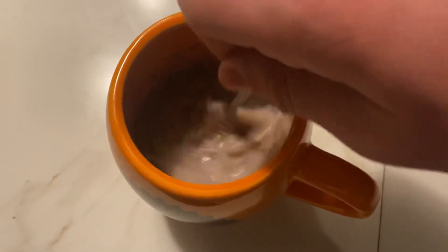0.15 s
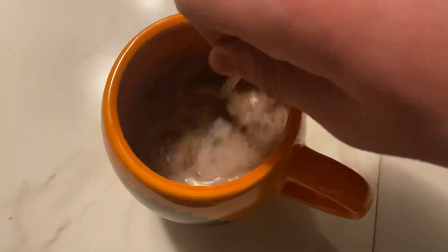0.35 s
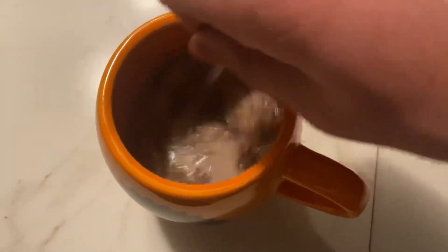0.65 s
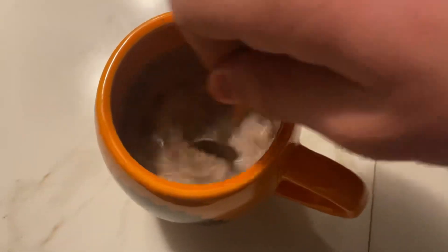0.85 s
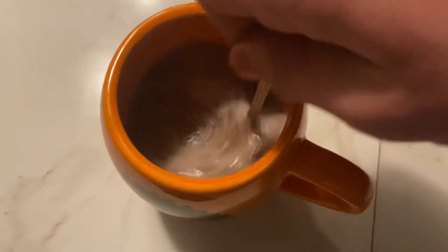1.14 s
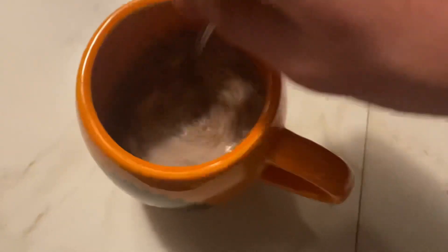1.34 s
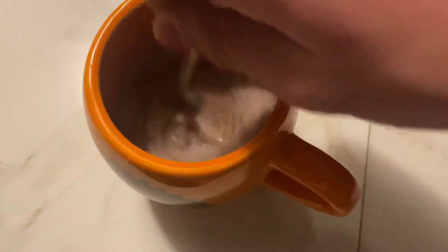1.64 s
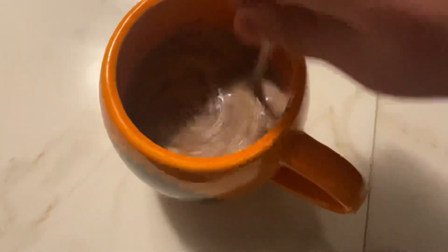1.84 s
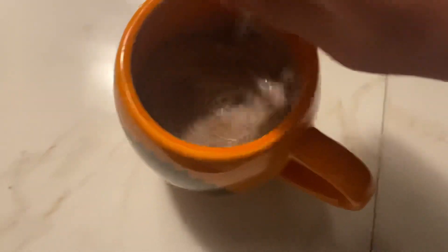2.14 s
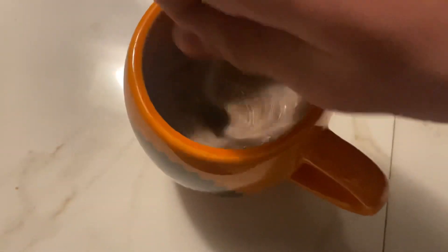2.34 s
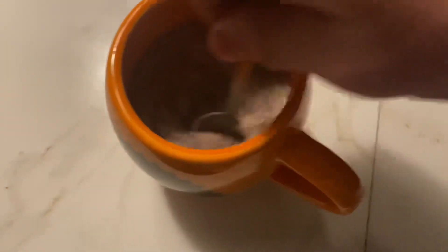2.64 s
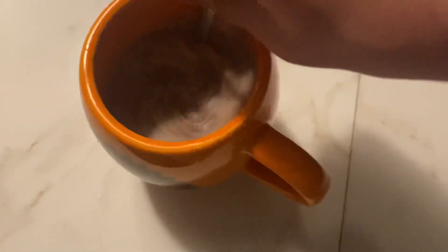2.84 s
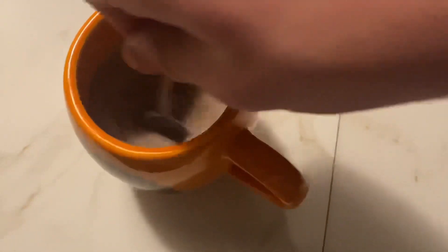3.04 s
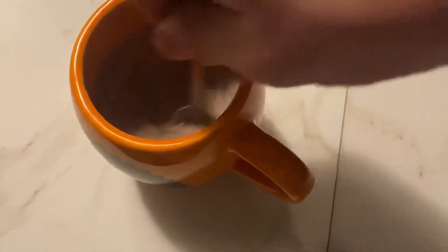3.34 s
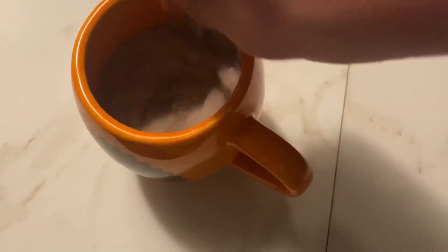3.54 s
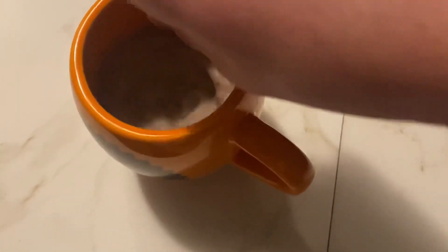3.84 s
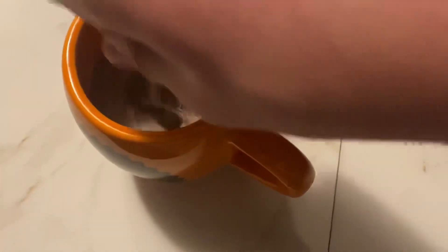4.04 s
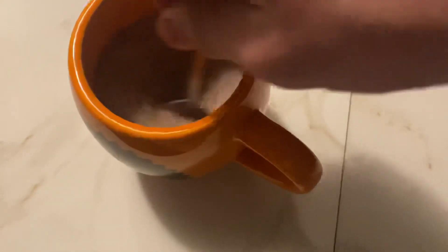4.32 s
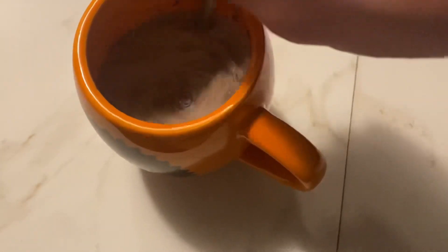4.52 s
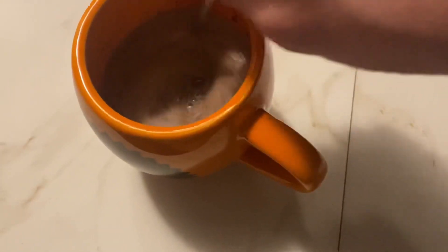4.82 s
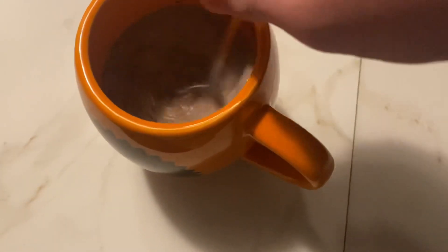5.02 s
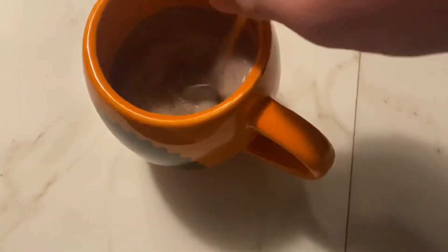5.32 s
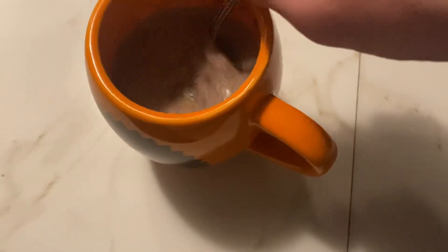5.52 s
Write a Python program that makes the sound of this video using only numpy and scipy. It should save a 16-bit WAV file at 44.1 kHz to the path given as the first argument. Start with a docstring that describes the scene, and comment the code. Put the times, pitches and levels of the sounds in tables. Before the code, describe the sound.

A metal spoon clinks quickly and unevenly around a ceramic mug, with hollow knocks, wet gurgles and light froth swishes in a small kitchen.

```python
"""A metal spoon stirs a drink in a ceramic mug on a kitchen counter, close to a pair of small microphones.
Each blow is a tick of filtered noise with dying sines for the wall of the mug and the air inside it.
Between blows the drink gurgles (noise around a sliding pitch) and the froth swishes (swarms of ringing bubbles).
Now and then the spoon chatters along the wall, and the mug rocks and knocks on the counter.
A small, hard room answers with dense echoes over a low hum of filtered noise."""
import sys
import numpy as np
from scipy import signal
from scipy.fft import rfft, irfft
from scipy.io import wavfile

SR = 44100
rng = np.random.default_rng(int(sys.argv[2]) if len(sys.argv) > 2 else 0)


def inscribe(sig):
    """Save sig as 16-bit PCM at rate SR to the path in sys.argv[1].

    A 1-D sig is mono; a 2-D sig holds one channel per row.
    Samples are clipped to [-1, 1] before scaling.
    """
    pcm = np.round(np.clip(np.atleast_2d(sig).T, -1, 1) * 32767)
    wavfile.write(sys.argv[1], SR, pcm.astype(np.int16))


N = 250047  # length of the scene in samples
T = np.arange(N) / SR  # time in the scene, s
AGE = np.arange(SR // 12) / SR  # time since the start of one short sound, s

# The parts of the mug and spoon that knock, clink, tick and thud, in that order:
# (lowest frequency [Hz], upper limit [Hz])
REGISTERS = [(1150, 2000), (2000, 5000), (5000, 16000), (200, 650)]
# Tone of the scrape when spoon meets wall, also used for bursting froth:
# (frequency [Hz], relative level [dB per Hz])
TICK_SPECTRUM = [(1500, -4.5), (3000, -13.5), (5000, 0.5), (7000, -2.5), (9300, -2), (11000, -7),
                 (13500, -9.5), (14100, -15.5), (15700, -15.5), (17000, -35.5)]
THUD_DB, THUD_PER_DB = -30.5, 0.5757  # the dull thud grows more slowly than the blow
# Tick against clink, dB; harder blows and those with a strong knock tick more (dB per dB)
TICK_DB, TICK_PER_HARDNESS, TICK_PER_KNOCK = -6, 0.29, 0.13
REBOUND_DB, REBOUND_S = -4, 0.0703  # a blow that follows closely on another ticks less


def blows(lead_db=0, lead_t60=0.01685, lead_rise_s=0.00058, spoon_db=-5, air_delay_s=0.000418):
    """Every blow: a tick, the wall's knock and clink, then the hollow ring of the air over a dull thud."""
    out, hits = np.zeros((2, N)), contacts()
    knock_modes, clink_modes, tick_modes, thud_modes = [register(lo, hi) for lo, hi in REGISTERS]
    pauses = np.diff([row[0] for row in hits], prepend=-1)
    air_cut, knock_cut = steep(hz=849), steep(hz=950)
    scrapes = colour(np.array([tick() for _ in hits]), TICK_SPECTRUM)
    for hit, scrape, pause in zip(hits, scrapes, pauses):
        s, air_db, air_hz, hardness_db, clink_hz, knock_db = hit
        clink_db = air_db + hardness_db
        tick_db = clink_db + TICK_DB + TICK_PER_HARDNESS * hardness_db
        tick_db += TICK_PER_KNOCK * max(knock_db, 0)
        tick_db += REBOUND_DB * np.exp(-pause / REBOUND_S)
        thud_db = THUD_DB + THUD_PER_DB * air_db
        knock = burst(signal.lfilter(*knock_cut, wall_ring(*knock_modes, stray=2.9)))
        # one pitch of the wall leads the clink
        lead = burst(mode(clink_hz, lead_t60) * (1 - np.exp(-AGE / lead_rise_s)))
        clink = burst(wall_ring(*clink_modes, stray=1.5, contact_s=0.001672) + amp(lead_db) * lead)
        contact = burst(burst(scrape) + amp(spoon_db) * wall_ring(*tick_modes, stray=0.36))
        thud = wall_ring(*thud_modes, stray=0.99, contact_s=0.0014)
        add(out, s, amp(clink_db) * clink + amp(tick_db) * contact + amp(thud_db) * thud)
        air = air_ring(air_hz, air_cut)
        add(out, s + air_delay_s, amp(air_db) * air + amp(clink_db + knock_db) * knock)
    return out


# Single blows of the spoon on the wall: (time [s], level of the air ring [dB], air pitch [Hz],
# hardness = clink over air ring [dB], leading wall pitch [Hz], knock over clink [dB])
BLOWS = [(.0209, -56.5, 1150, 15.5, 2430, -15), (.0363, -23, 993, -8, 2570, -6),
         (.1015, -50, 1060, 11.5, 4085, -16.5), (.2397, -50.5, 1028, 9, 2565, -17.5),
         (.2862, -47, 990, 8.5, 3936, -28), (.356, -18, 891, -9, 4066, -17.5),
         (.3834, -29, 956, -10, 4496, -3.5), (.6863, -17.5, 992, -12.5, 2720, 1.5),
         (.8005, -27, 940, 1.5, 2453, -2.5), (.9547, -26, 1021, -4.5, 2847, -3),
         (1.1205, -24, 996, -5, 2580, 8.5), (1.1913, -28, 942, -11.5, 2500, 6),
         (1.2865, -21.5, 1030, -7.5, 2910, -2.5), (1.356, -24, 983, -19.5, 2776, -1.5),
         (1.427, -58, 1040, 22, 2923, -8.5), (1.4485, -42, 920, 7, 2690, -2),
         (1.4681, -17, 1068, -5.5, 2410, -5), (1.627, -25.5, 993, -11, 2947, -2),
         (1.7992, -21, 928, -6.5, 2614, -8.5), (1.8256, -23, 1080, -5, 2842, 2.5),
         (1.9113, -34, 1016, -4.5, 2770, 4), (2.0088, -11.5, 1039, -5.5, 2731, -4),
         (2.0865, -18.5, 1004, -15, 4010, 4.5), (2.1951, -29, 1016, 4.5, 2746, -3),
         (2.1981, -19.5, 1062, -5, 2478, -2), (2.4222, -23, 1052, -13.5, 2906, -3.5),
         (2.487, -31, 961, -9, 2670, 4), (2.5367, -50.5, 985, 10, 2806, 3),
         (2.5874, -28, 1073, -5, 2627, 1), (2.729, -19.5, 908.3, -5.5, 2857, -3),
         (2.8173, -25, 1022, -8, 2364, 2), (2.9341, -23.5, 1061, -4, 2900, 3.5),
         (3.0279, -17, 968.4, -5.5, 2990, -4.5), (3.108, -23, 1134, 2, 3007, -8.5),
         (3.252, -50, 1040, 9.5, 2628, 2.5), (3.4793, -25, 905.5, -2.5, 2925, 2),
         (3.5212, -34, 1014, -8.5, 2480, 4.5), (3.635, -20, 1002, -2.5, 2950, -1.5),
         (3.6562, -31, 942, -3, 3090, 0), (3.792, -20.5, 990, -3.5, 3200, -3.5),
         (3.8172, -20.5, 1037, -12, 2656, 1.5), (3.922, -33.5, 1006, 4, 2980, 3),
         (3.968, -30.5, 1004, 3.5, 2883, -8.5), (3.9838, -42, 948, 6.5, 3014, -8.5),
         (4.102, -27.5, 984, -0.5, 2790, -6.5), (4.1796, -21, 1033, -14.5, 2928, 9),
         (4.248, -36, 924, -3, 2591, 12.5), (4.3279, -32.5, 967, -6, 2830, 3),
         (4.496, -24.5, 915.5, -15.5, 2917, 3), (4.572, -23, 920, -6, 2850, 2),
         (4.6323, -16.5, 962, -3, 2750, 4), (4.6506, -25.5, 940.5, 2, 3070, -2),
         (4.6895, -19.5, 1017, -8.5, 2740, 1.5), (4.835, -23, 943, -8.5, 2888, -8.5),
         (4.8645, -15, 946, -12.5, 2962, 0), (5.1956, -14, 911.4, -6.5, 3084, 5.5),
         (5.319, -19, 997.5, -2, 2854, -6)]
# The spoon chatters along the wall, bounce after bounce: (time [s], length [s], gap [s], fade [dB per s],
# first air ring [dB], air pitch [Hz], hardness [dB], leading wall pitch [Hz], knock over clink [dB])
RATTLES = [(0.987, .015, 0.00669, 556, -20, 981.7, -9.5, 3715, -6),
           (1.481, .013, .013, 400, -19.5, 929, -23.5, 2473, 10.5),
           (1.5094, .051, 0.01058, 175, -21, 953, -11.5, 2414, -2),
           (5.4769, .032, .0053, 55.5, -17.5, 987.3, -4.5, 2919, -5)]
GAP_SCATTER, PITCH_SCATTER = .14, 0.0444  # most that a bounce is late or sharp, as a share of gap or pitch


def contacts():
    """The single blows and the fading bounces of every rattle, in order of time."""
    rows = list(BLOWS)
    for start, length, gap, fade, db, air_hz, hardness, wall_hz, knock in RATTLES:
        for k in range(round(length / gap) + 1):
            late, sharp = rng.uniform(-1.1, 1, 2)
            s = start + gap * (k + GAP_SCATTER * late)
            pitch = air_hz * (1 + PITCH_SCATTER * sharp)
            rows.append((s, db - fade * gap * k, pitch, hardness, wall_hz, knock))
    return sorted(rows)


def tick(decay_s=0.00253, rise_s=0.00026):
    """Steel grates on glaze for a few milliseconds: a short puff of noise."""
    return rng.standard_normal(len(AGE)) * np.exp(-AGE / decay_s) * (1 - np.exp(-AGE / rise_s))


def air_ring(hz, cut, shortest_t60=0.02656, swell_s=0.000464):
    """The air above the drink swings up within about a cycle, then dies away."""
    t60 = shortest_t60 * rng.uniform(1.0, 1.1)
    ring = heard(np.array([-1j]), modes([hz], [t60]))
    return burst(signal.lfilter(*cut, ring * (1 - np.exp(-(AGE / swell_s) ** 2))))


def wall_ring(db, rings, stray, scatter_db=3.5, contact_s=0.000796):
    """The modes of one register; where the spoon lands decides how strongly each one answers."""
    strength = amp(db + scatter_db * rng.standard_normal(len(db)))
    weights = strength * np.exp(2j * np.pi * rng.random(len(db)))  # each starts at a random phase
    return burst(heard(weights, rings, stray) * (1 - np.exp(-(AGE / contact_s) ** 2)))


# Natural ringing tones (modes) of mug and spoon:
# (frequency [Hz], relative level [dB], time to fall by 60 dB [s])
MODES = [(259.6, -8.5, 0.0374), (336.7, -5, 0.046), (443.7, 0.5, 0.0375), (484.3, 4.5, 0.0548),
         (561.5, 4, 0.0381), (1231.6, 2, 0.0321), (1284.5, -6, 0.051), (1498, -6, 0.0404),
         (1623.2, 0, 0.0248), (1833.5, -11, 0.0373), (2173.5, -14.5, 0.0246), (2428, -7, 0.01),
         (2681.5, -1.5, 0.0272), (2792.7, -4, 0.0199), (2952, -17, 0.0514), (3351.5, 0, 0.0114),
         (3692, -8.5, 0.01534), (3929, -2, 0.01123), (4197, -18.5, 0.0502), (4434, -5, 0.01147),
         (5185, -21.5, 0.075), (5529, -5, 0.013), (6215, -2.5, 0.027), (6945, 4, 0.0092),
         (7510, -9.5, 0.03), (7990, -4.5, 0.012), (9100, 8, 0.0038)]


def register(lo, hi):
    """Levels and oscillations of the modes between two frequencies."""
    hz, db, t60 = np.transpose([row for row in MODES if lo <= row[0] < hi])
    return db, modes(hz, t60)


# How lively the whirling drink is: (time [s], level [dB])
STIR = [(0, -43), (.2, -69.5), (.65, -64), (.8, -50.5), (1.9, -43), (1.98, -52), (2.1, -43), (3.3, -47),
        (3.42, -59), (3.6, -60), (4, -38.5), (4.07, -57), (4.2, -46.5), (4.95, -59), (5.12, -65.5),
        (5.45, -57), (5.67, -58)]
# Sweeps of the spoon's bowl, each a gurgle with a swish of froth:
# (middle time [s], length [s], gurgle level [dB], air pitch [Hz], swish level [dB])
SWEEPS = [(0.137, .06, -55.5, 996, -56.5), (.591, 0.043, -47, 1006, -51),
          (0.771, 0.0653, -41.5, 1000, -46.5), (0.848, 0.1056, -35, 1002, -71),
          (1.028, .055, -30.5, 1004, -51), (1.105, .04, -35.5, 987.7, -49),
          (1.334, 0.0412, -34.5, 982, -43), (1.522, 0.0969, -25, 915, -47),
          (1.673, 0.079, -32, 1026, -42.5), (1.892, 0.0906, -41, 1012, -55),
          (2.082, 0.0427, -27, 1020, -40), (2.263, 0.0748, -32.5, 1030, -36.5),
          (2.323, 0.0643, -31.5, 1060, -58.5), (2.391, 0.115, -45.5, 1020, -36.5),
          (2.62, 0.0874, -39, 1060, -36.5), (2.78, 0.0883, -45.5, 950, -39.5),
          (2.984, 0.1353, -38, 1034, -43), (3.2, 0.055, -55, 990.5, -47.5), (3.334, .075, -42.5, 1013, -45),
          (3.585, 0.0595, -39.5, 1008, -49), (3.672, .04, -27.5, 1004, -35),
          (3.914, 0.06, -53.5, 995, -47.5), (4.252, 0.0786, -42, 1000, -47),
          (4.358, 0.0626, -32, 901.9, -45), (4.45, 0.133, -45, 1001, -42), (4.717, 0.0692, -31, 1051, -45),
          (4.963, 0.0414, -44.5, 1022, -43)]
# Tone of the splashing drink: (frequency [Hz], relative level [dB per Hz])
CHURN_SPECTRUM = [(200, -27.5), (470, -22.5), (660, -26.5), (850, -9), (980, 5), (1150, -2), (1400, -17),
                  (1650, -12), (2100, -16), (2850, -25), (5000, -34.5), (15000, -46)]


def gurgles(width_hz=70, glide=0.13133, splash_db=-7):
    """Each slosh blows the air resonance, whose pitch slides as the surface tilts; splashes churn under it."""
    churn = evened(colour(grains(per_s=2500, spread_db=5.5), CHURN_SPECTRUM))
    out = churn * amp(np.interp(T, *np.transpose(STIR)))
    smooth = signal.butter(2, width_hz, fs=SR)
    for s, length, db, hz, _ in SWEEPS:
        n, start = int(length * SR), int((s - length / 2) * SR)
        # slow random flutter carried by the sliding pitch: a breathy tone
        flutter = signal.lfilter(*smooth, [1, 1j] @ rng.standard_normal((2, SR // 4)))[-n:]
        pitch = hz * (1 + glide * rng.uniform(-0.952, 1) * np.linspace(-1, 1, n))
        tone = evened((flutter * np.exp(2j * np.pi * np.cumsum(pitch) / SR)).real)
        slosh = tone + amp(splash_db) * churn[start:start + n]
        add(out, start / SR, amp(db) * slosh * np.sin(np.linspace(0, np.pi, n)))
    return out


# Tone of the swishing froth, laid over the bubble swarm: (frequency [Hz], relative level [dB per Hz])
SWISH_SPECTRUM = [(700, -34), (1500, 6), (2100, 2), (2850, 10), (3600, -2.5), (4200, -3.5), (5000, -13),
                  (7500, -12.5), (9400, -18.5), (11000, -19), (13500, -22.5), (16000, -21.5)]


def swishes(quality=18, eddy_db=4.5, whirl_db=-12, spread_db=3.0, count=36, bubbles=600):
    """Swarms of tiny bubbles ring for a few cycles each as the spoon sweeps by."""
    swarm = np.zeros(N)
    for hz in np.geomspace(1300, 14000, count):  # one pitch for each bubble size
        births = np.zeros(N)
        size = amp(spread_db * np.minimum(rng.exponential(1, bubbles), 4))
        births[rng.integers(0, N, bubbles)] = size * rng.choice([-1, 1], bubbles)
        # each bubble size swells and fades on its own as eddies pass
        eddies = np.interp(T, np.linspace(0, T[-1], 250), rng.standard_normal(250))
        births = births * amp(eddy_db * eddies)
        r = np.exp(-np.pi * hz / quality / SR)
        resonator = [1, -2 * r * np.cos(2 * np.pi * hz / SR), r * r]
        swarm += np.sqrt(hz) * evened(signal.lfilter([1, 0, -1], resonator, births))
    sweep = amp(whirl_db + np.interp(T, *np.transpose(STIR)))
    for s, length, _, _, db in SWEEPS:
        swell = np.sin(np.linspace(0, np.pi, int(length * SR))) ** 1.26
        add(sweep, s - length / 2, amp(db) * swell)
    return sweep * evened(colour(swarm, SWISH_SPECTRUM))


def froth(level_db=-71):
    """Tiny bubbles burst on the surface: sparse, random ticks."""
    pops = np.convolve(grains(per_s=48, spread_db=-2), tick()[:256])[:N]
    return amp(level_db) * evened(colour(pops, TICK_SPECTRUM))


# The mug rocks and its foot knocks on the counter:
# (time [s], counter level [dB], counter pitch [Hz], thud level of the mug [dB])
BUMPS = [(0.0358, -64, 100, -34), (1.481, -44.5, 52.3, -33), (1.514, -39, 125, -34.5),
         (1.541, -48.5, 55, -31.5), (1.798, -45.5, 100, -36), (2.088, -44, 68.4, -39),
         (4.498, -39.5, 55, -40), (4.739, -40.5, 86.4, -61), (5.196, -56.5, 100, -35.5),
         (5.485, -46, 68, -29), (5.506, -44, 137, -32.5)]


def bumps(t60=0.041, swell_s=.005, contact_s=.002):
    """The mug's foot knocks on the counter: a soft, low note from the slab and a thud from the mug."""
    out, low_modes = np.zeros((2, N)), register(*REGISTERS[3])
    for s, db, hz, thud_db in BUMPS:
        slab = burst(mode(hz, t60) * (1 - np.exp(-AGE / swell_s)))
        thud = wall_ring(*low_modes, stray=0.7, contact_s=contact_s)
        add(out, s, amp(db) * slab + amp(thud_db) * thud)
    return out


# How long the kitchen's echoes last: (frequency [Hz], time to fall by 60 dB [s])
ROOM_T60 = [(150, 0.0144), (500, 0.54), (1000, 0.2846), (3000, 0.3933), (7000, 0.1438), (15000, 0.2464)]
# How strongly the kitchen answers: (frequency [Hz], level [dB])
ROOM_DB = [(150, 0), (450, -4), (1000, -11.5), (3000, -14), (7000, -12.5), (15000, -16.5)]


def kitchen(x, early_db=3, early_s=0.00798, first_s=0.0031):
    """Dense echoes, strongest from the counter and near wall, each band dying at its own speed."""
    age = np.arange(SR * 2 // 3) / SR
    taps = rng.standard_normal((2, len(age))) * (rng.random((2, len(age))) < .1) * (age > first_s)
    hz, t, z = signal.stft(alike(*taps), SR, nperseg=256)
    t60 = read(ROOM_T60, hz)[:, None]
    # dividing by the root of t60 keeps a band's energy the same however long it lasts
    z = z * np.exp(-np.log(1000) * t / t60) / np.sqrt(t60) * amp(read(ROOM_DB, hz))[:, None]
    tail = signal.istft(z, SR, nperseg=256)[1][:, :len(age)]
    tail = tail * np.sqrt(2 * np.log(1000) / SR) / taps.std()
    tail = tail * (1 + amp(early_db) * np.exp(-age / early_s)) / 1.019
    return signal.fftconvolve(x[None], tail, axes=1)[:, :N]


# How alike the room sounds left and right, 1 = the same: (frequency [Hz], likeness [0 to 1])
LIKENESS = [(60, 0.927), (250, 0.842), (700, 0.077), (3000, 0.21), (5500, 0.43), (7000, 1), (10000, 1)]


def alike(a, b):
    """Two unrelated signals become a left-right pair as alike as the room's sound is."""
    same = np.clip(read(LIKENESS, np.fft.rfftfreq(len(a), 1 / SR)), -1, 1)
    return np.array([a, irfft(same * rfft(a) + np.sqrt(1 - same ** 2) * rfft(b), len(a))])


# Tone of the house's hum: (frequency [Hz], relative level [dB per Hz])
HUM_SPECTRUM = [(15, -24.5), (35, -13.5), (60, 4.5), (90, 0.5), (150, -6), (300, -14), (600, -22.5),
                (1500, -30.5), (4000, -44), (10000, -44.5), (17000, -54)]


def hum(level_db=-53.5):
    """The low, steady background of the house: filtered noise."""
    noise = colour(rng.standard_normal((2, N)), HUM_SPECTRUM, size=16384)
    return amp(level_db) * evened(alike(*noise))


def amp(db):
    """Decibels to gain."""
    return 10 ** (np.asarray(db) / 20)


def read(points, hz):
    """A table's value along a log-frequency axis."""
    f, value = np.transpose(points)
    return np.interp(np.log(hz + 1), np.log(f), value)


def evened(x):
    """Scales to rms 1."""
    return x / np.sqrt(np.mean(x ** 2) + 1e-20)


def burst(x):
    """Scales a short sound (a pair by its left side) to the energy of 10 ms at rms 1."""
    return x / np.sqrt(np.sum(np.atleast_2d(x)[0] ** 2) * 100 / SR + 1e-20)


def add(mix, s, sound):
    """Mixes a sound in at time s."""
    part = mix[..., max(round(s * SR), 0):][..., :sound.shape[-1]]
    part += sound[..., :part.shape[-1]]


def colour(x, spectrum, size=2048):
    """Filters with the given spectrum along the last axis, with no sound ahead of its cause."""
    log_gain = np.log(amp(read(spectrum, abs(np.fft.fftfreq(size, 1 / SR)))))
    taps = np.fft.ifft(np.exp(np.conj(signal.hilbert(log_gain)))).real[:size // 2]
    return signal.oaconvolve(x, taps.reshape((1,) * (x.ndim - 1) + (-1,)), axes=-1)[..., :x.shape[-1]]


def steep(hz, order=4):
    """A high-pass: small things radiate little below their lowest mode."""
    return signal.butter(order, hz, "highpass", fs=SR)


def mode(hz, t60, phase=0):
    """One dying sine."""
    return np.sin(2 * np.pi * hz * AGE + phase) * np.exp(-np.log(1000) * AGE / t60)


def modes(hz, t60):
    """Dying complex oscillations, one row for each mode."""
    return np.exp(np.outer(2j * np.pi * np.asarray(hz) - np.log(1000) / np.asarray(t60), AGE))


def heard(weights, rings, stray=1.0):
    """Sums modes for two microphones; hand and spoon shade each one differently on its way to the right."""
    count = len(weights)
    shade = 1 + stray * (rng.standard_normal(count) + 1j * rng.standard_normal(count)) / np.sqrt(2)
    return (np.array([weights, weights * shade / np.hypot(1, stray)]) @ rings).real


def grains(per_s, spread_db):
    """Random clicks of uneven size: a positive spread makes a few stand out, a negative one a few weaker."""
    size = amp(spread_db * np.minimum(rng.exponential(1, N), 4)) * rng.choice([-1, 1], N)
    return size * (rng.random(N) < per_s / SR)


# How much louder the mug is on the left: (frequency [Hz], left over right [dB])
BALANCE = [(100, 1.5), (450, 0.62), (700, 7.5), (1000, 11.17), (1600, 4.4), (2400, 8), (2850, 8.5),
           (3400, 10.7), (4300, 1.1), (5800, 4), (8500, 0.5), (16000, 1)]


def scene():
    """The mug stands nearer the left microphone; the room reaches both more evenly."""
    mug = blows() + gurgles() + swishes() + froth() + bumps()
    room = kitchen(mug[0])
    shade = amp(-read(BALANCE, np.fft.rfftfreq(N, 1 / SR)))
    # the square root halves the room's left-right difference in dB
    right = irfft(rfft(mug[1]) * shade + rfft(room[1]) * np.sqrt(shade), N)
    return np.array([mug[0] + room[0], right]) + hum()


# How far the left microphone leads the right: (frequency [Hz], phase lead [radians])
PORT_PHASE = [(100, 0), (650, 0.5), (950, -0.6), (1300, 1.5), (2100, 1.5), (2900, 2), (3400, -0.1043),
              (6000, 1.4325), (7200, 0.8345), (9000, -3.5), (11300, -6), (13300, -10), (15000, -12.5)]


def record(dry, edge_hz=16600):
    """The two microphone ports hear the sound out of step, most in the treble; then the band limit."""
    turn = np.exp(-1j * read(PORT_PHASE, np.fft.rfftfreq(N, 1 / SR)))
    pair = np.array([dry[0], irfft(rfft(dry[1]) * turn, N)])
    low_pass = signal.firwin(511, edge_hz, window=("kaiser", 9), fs=SR)
    return signal.oaconvolve(pair, low_pass[None], "same")


dry = scene()
out = record(dry)
inscribe(out)
```